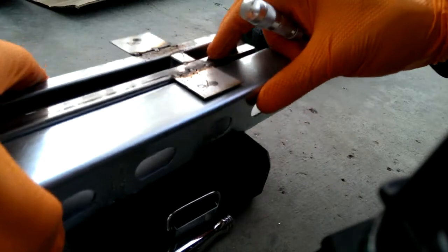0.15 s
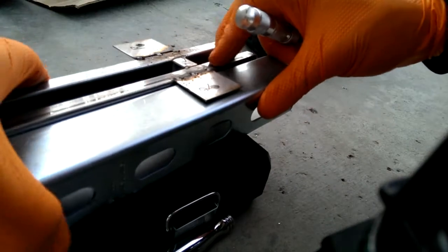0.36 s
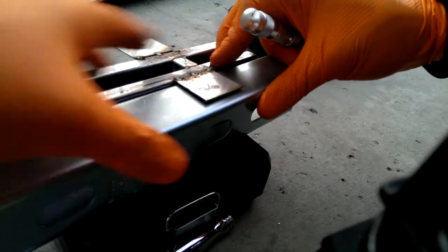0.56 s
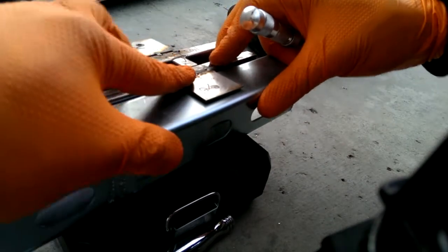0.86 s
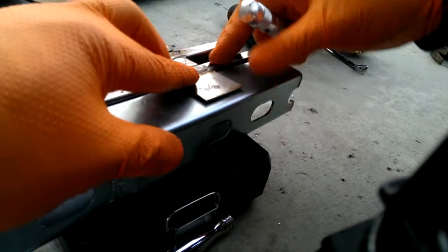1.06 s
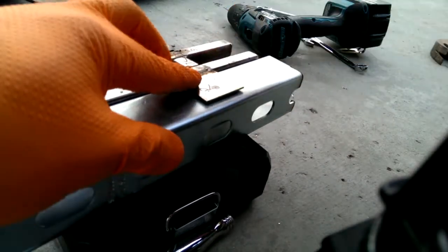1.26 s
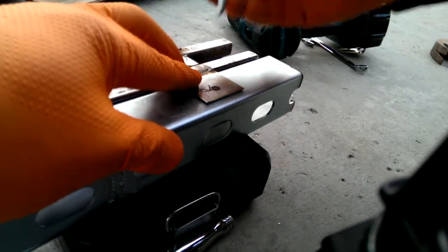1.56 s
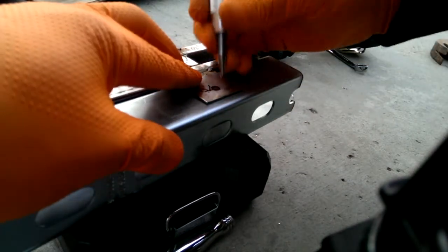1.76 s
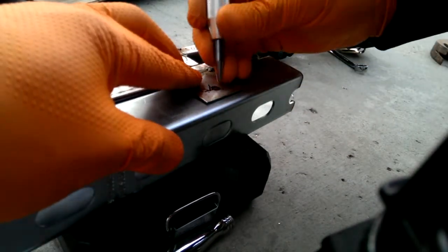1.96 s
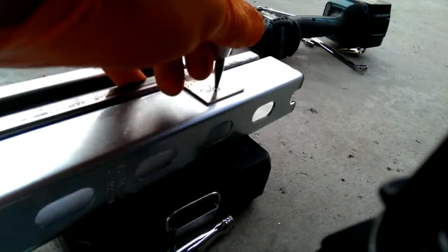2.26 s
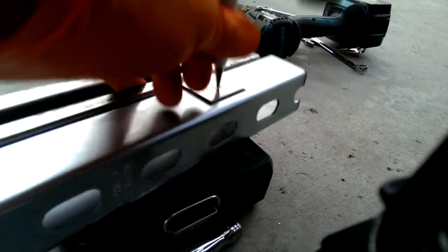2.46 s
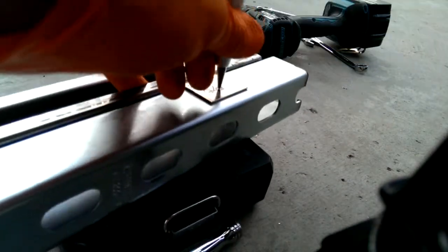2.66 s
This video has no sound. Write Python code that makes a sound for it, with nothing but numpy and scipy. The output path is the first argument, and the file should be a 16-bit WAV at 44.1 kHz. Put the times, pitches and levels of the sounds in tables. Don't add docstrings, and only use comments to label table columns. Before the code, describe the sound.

Loud metallic crack of a spring punch on a steel channel, following bracket clinks and quiet glove ticks

```python
import sys
import numpy as np
from scipy import signal
from scipy.io import wavfile
from scipy.ndimage import uniform_filter1d

SR = 44100
rng = np.random.default_rng(int(sys.argv[2]) if len(sys.argv) > 2 else 0)


def log_audio(samples):
    frames = np.atleast_2d(samples).T
    limited = np.clip(frames, -1, 1)
    pcm = np.round(limited * 32767).astype(np.int16)
    wavfile.write(sys.argv[1], SR, pcm)


def nominal_scale(level):
    x = np.asarray(level, float) / 20
    return 10 ** x


N = 123479

# pitch in Hz, level in dB per Hz.
RUMBLE_SHAPE = [(24, -41), (33, 0.5), (45, -0.5), (70, -3.5), (90, -13), (125, -13.5), (165, -18.5),
                (330, -36)]
HISS_SHAPE = [(250, -18.5), (330, -6.5), (600, -21), (1500, -13), (2700, -19), (5000, -24.5), (9000, -30),
              (16000, -30)]
# pitch in Hz, likeness from -1 to 1.
EAR_LIKENESS = [(60, 0.45), (500, 0.86), (1400, -0.49), (4000, 0.1)]
# pitch in Hz, left over right in dB.
AIR_LEAN = [(500, 0.5), (4400, 1.2), (9000, 3)]
# time in seconds, level in dB.
SWELL = [(0, 2.5), (.25, 2.5), (.9, -0.5), (1.4, -1), (1.9, -3), (2.8, -2)]
# pitch in Hz, level in dB.
MOTOR_HUMS = [(48.4, -51), (64.5, -48.5), (262.4, -68), (524.5, -78.5)]
# time in seconds, level in dB.
WHINE_LEVEL = [(.3, -59), (.54, -50), (.62, -69.5), (.87, -52), (1.0, -69.5), (1.57, -71.5), (1.78, -55.5),
               (2.03, -70), (2.25, -57.5), (2.68, -69), (2.8, -57)]

# pitch in Hz, level in dB per Hz.
STEEL_BODY = [(90, -18), (200, -12), (380, -5.5), (900, -7.5), (1400, -7.5), (4000, -8), (6000, -19)]
STEEL_TREBLE = [(5000, -7), (7000, -15.5), (14800, -15), (15600, -30)]
# pitch in Hz, left over right in dB.
NEAR_LEAN = [(700, 2), (1300, 9.5), (2400, 4), (4400, 2), (8100, 10.5), (15000, 12.5)]

# time in seconds, level in dB, brightness in dB.
SLIDE = [(0, -44.5, -13.5), (.05, -53.5, -5.5), (.11, -62, -2), (.116, -37, -3), (.21, -36, -12),
         (.24, -46, -4), (.29, -40.5, -23), (.345, -35, -33), (.375, -64, -13)]
SETTLE = [(2.372, -21.5, -19), (2.41, -29.5, -5), (2.43, -32, 5), (2.49, -26, -6), (2.53, -35.5, -11),
          (2.57, -26, -33), (2.6, -41.5, -29), (2.71, -55, -42), (2.8, -58.5, -33)]
# start in seconds, peak in dB, main pitch in Hz,
# time to fall 60 dB in seconds, brightness in dB.
KNOCKS = [(.114, -28.5, 630, 0.061, -8), (0.126, -20.5, 7600, 0.012, -1), (0.1342, -27, 5000, 0.03, 8),
          (.138, -25, 2820, 0.019, -13), (0.143, -26.5, 2880, 0.03, 5), (.163, -31.5, 6200, .04, 4),
          (.181, -19, 850, 0.043, -15), (0.184, -20, 2410, 0.029, 3), (.2, -17, 1050, 0.027, -23),
          (.25, -17, 8160, 0.023, 7), (0.269, -14, 696, 0.02, -2), (.281, -15, 2820, 0.075, -4.5),
          (.335, -23.5, 1150, 0.036, -46), (2.472, -16, 905, 0.035, -22), (2.51, -18.5, 1440, 0.08, -28),
          (2.608, -24, 1440, 0.047, -31), (2.641, -32.5, 1060, 0.038, -33), (2.6606, -29, 3310, 0.14, -33),
          (2.695, -35, 2020, 0.037, -21), (2.69, -33.5, 1380, 0.089, -37)]
# pitch in Hz, level in dB, time to fall 60 dB in seconds.
HOLLOW_BOOMS = [(211.3, -38, 0.039), (405.4, -43, 0.03), (653, -34, 0.024)]
# start in seconds, level in dB, pitch in Hz,
# time to fall 60 dB in seconds.
THUMPS = [
    (.02, -46, 458, 0.13),
    (.186, -33, 202, 0.092),
    (2.166, -53.5, 1216, .1),
    (2.368, -22, 305, 0.097),
    (2.378, -33, 125, 0.17),
    (2.545, -31.5, 1208, 0.11),
    (2.56, -34, 389, 0.14),
    (2.661, -53.5, 2760, .5),
    (2.688, -46.5, 621, .3),
]

# start in seconds, peak in dB, pitch in Hz, width in Hz,
# time to fall 60 dB in seconds.
TICKS = [(0.614, -45.5, 1650, 900, .025), (0.671, -41.5, 1190, 400, 0.023),
         (0.689, -47, 11000, 12000, 0.013), (0.754, -43.5, 4500, 5000, 0.0096),
         (.97, -44, 5570, 7000, 0.022), (1.123, -49.5, 5000, 3000, .03), (1.2548, -48, 1840, 600, 0.053),
         (1.307, -45, 3400, 3000, 0.011), (1.4291, -39, 5400, 9000, 0.011), (1.4413, -44, 855, 400, .025),
         (1.442, -41, 3530, 2980, 0.025), (1.461, -48, 1840, 700, .025), (1.4817, -33.5, 2250, 2510, 0.011),
         (1.4819, -34.5, 9000, 9000, 0.011), (1.577, -53, 2000, 600, 0.027), (1.612, -48, 2100, 700, 0.057),
         (1.8937, -52.5, 2100, 1500, 0.016), (2.165, -46, 2330, 1800, 0.029),
         (2.319, -50, 4000, 4000, 0.016)]
# start in seconds, length in seconds, level in dB, centre in Hz, width in Hz.
RUBS = [(0.444, 0.12, -53.5, 5400, 4000), (0.425, 0.16, -60.5, 11700, 4900),
        (0.59, 0.071, -59.5, 3470, 4000), (.73, 0.066, -64, 4000, 3000), (.75, 0.049, -61, 1700, 150),
        (.9, 0.28, -67, 10400, 6000), (0.999, 0.034, -60.5, 11000, 4000), (1.235, .06, -64.5, 4000, 3000),
        (1.566, 0.074, -60.5, 12000, 6000), (1.556, 0.085, -62.5, 1950, 895), (1.593, .04, -61, 3600, 2500),
        (2.009, 0.13, -69.5, 3980, 6070), (2.204, 0.087, -60.5, 3700, 450), (2.24, .045, -68, 2900, 300)]
# start in seconds, length in seconds, level in dB; then its pitches in Hz.
SQUEAK = (0.843, 0.15, -73.5)
SQUEAK_HZ = (3700, 6400, 9000)

# start in seconds, peak in dB, crack pitch in Hz,
# time to fall 60 dB in seconds, left over right in dB.
BLOWS = [
    (2.3671, -6.5, 2280, 0.08, 10),
    (2.372, -2.5, 3700, 0.067, -8.5),
    (2.382, -11.5, 5600, 0.068, 6),
    (2.388, -10.5, 4430, 0.085, 8),
    (2.3955, -10.5, 3470, 0.038, -1),
    (2.403, -9.5, 1500, 0.025, 3.5),
    (2.408, -15, 1670, 0.017, 8),
    (2.46, -19, 4400, .04, 7),
    (2.484, -20.5, 3020, 0.078, 4),
    (2.5413, -13, 3700, 0.083, 1),
]
BLOW_RING_DB = [-4.5, -3, -8.5, -0.5, -7, -6, -6.5, -9, -14, -15]
# pitches in Hz, then for each the level in dB and time to fall 60 dB in seconds.
PUNCH_HZ = [4314, 4371, 4528, 5259, 5480, 6403, 6524, 7095, 10519, 11562, 11713, 13103, 14420]
PUNCH_RING = [(-1, 0.52), (-0.5, 0.47), (-7, 0.44), (-9.5, .4), (-11, 0.22), (-13, 0.57), (-15, .5),
              (-8, .3), (-9, .3), (-8, .3), (-5.5, 0.21), (-7, 0.15), (-14, .12)]
BRACKET_HZ = [2567, 2762, 2985, 3363, 3756, 3953, 8172, 9060, 10164, 11054, 12460]
BRACKET_RING = [(-13.5, .4), (-10, 1), (-11.5, 0.56), (-6, .45), (-12.5, 0.27), (-4, .38), (-16, 0.37),
                (-15, 0.22), (-15, 0.28), (-11.5, 0.23), (-18, .3)]
# time in seconds, level in dB.
GRIP = [
    (2.37, 0),
    (2.47, 2.5),
    (2.52, -4),
    (2.55, 2),
    (2.6, -5.5),
    (2.66, -18),
]


def evened(x):
    return x / np.sqrt(np.mean(x ** 2) + 1e-20)


def read(points, hz):
    f, value = np.transpose(points)
    return np.interp(np.log(hz + 1), np.log(f + 1), value)


def follow(curve, t):
    return nominal_scale(np.interp(t, *np.transpose(curve)))


def add(mix, s, sound):
    part = mix[:, round(s * SR):][:, :sound.shape[1]]
    part += sound[:, :part.shape[1]]


def coloured(x, db_of):
    db = np.maximum(db_of(abs(np.fft.fftfreq(2048, 1 / SR))), -90)
    minimum_phase = signal.hilbert(np.log(nominal_scale(db))).conj()
    taps = np.fft.ifft(np.exp(minimum_phase)).real[..., :1024]
    return signal.oaconvolve(x, taps * np.ones((2, 1)), axes=1)[:, :x.shape[1]]


def ears(hz):
    return np.outer([.5, -.5], read(NEAR_LEAN, hz))


def air(shape, level_db, patchy_db):
    frames, hz = N // 512 + 5, np.fft.rfftfreq(2048, 1 / SR)
    a, b, c, d, patches = rng.standard_normal((frames, 1025, 5)).T
    patches = evened(uniform_filter1d(uniform_filter1d(patches, 20, 0), 6, 1))
    same = np.clip(read(EAR_LIKENESS, hz), -1, 1)[:, None]
    left = a + 1j * b
    right = same * left + np.sqrt(1 - same ** 2) * (c + 1j * d)
    outside = (hz < .6 * shape[0][0]) | (hz > shape[-1][0] + 900)
    db = read(shape, hz) - 99 * outside + np.outer([.5, -.5], read(AIR_LEAN, hz))
    spectra = np.array([left, right]) * nominal_scale(db[:, :, None] + patchy_db * patches)
    noise = signal.istft(spectra, nperseg=2048, noverlap=1536)[1][:, :N]
    return nominal_scale(level_db) * evened(noise)


def workshop():
    t = np.arange(N) / SR
    waver_hz, ear_turns = 4, 0.41
    low = air(RUMBLE_SHAPE, -44.5, patchy_db=2.5)
    for hz, db in MOTOR_HUMS:
        beats = 0
        for k in (-.9, -.3, .45):
            turns = waver_hz * k * t + rng.random() + ear_turns * rng.random((2, 1))
            beats = beats + np.exp(2j * np.pi * turns)
        low += nominal_scale(db) * (beats * np.exp(2j * np.pi * hz * t)).real
    ear_phase = np.array([[0], [.6]])
    whine = nominal_scale(3.5) * follow(WHINE_LEVEL, t) * np.sin(2 * np.pi * 198.5 * t + ear_phase)
    swell_db = np.interp(t, *np.transpose(SWELL))
    hiss = air(HISS_SHAPE, -59.5, patchy_db=3.0) * nominal_scale(.7 * swell_db)
    return whine + low * nominal_scale(swell_db) + hiss


def hump(hz, centre_hz, width_hz):
    rise = (2 * hz / centre_hz) ** 2
    return rise / (1 + rise) / (1 + (2 * (hz - centre_hz) / width_hz) ** 2)


def steel(hz, bright_db):
    octaves_above = np.log2(np.maximum(hz / STEEL_BODY[-1][0], 1))
    octaves_below = np.log2(np.maximum(STEEL_TREBLE[0][0] / (hz + 1), 1))
    body = nominal_scale(read(STEEL_BODY, hz) - 13.2 * octaves_above)
    treble = nominal_scale(bright_db + read(STEEL_TREBLE, hz) - 10.6 * octaves_below)
    return body ** 2 + treble ** 2


def burst(t60, power_of, peak_db):
    t = np.arange(6000) / SR
    noise = rng.standard_normal((2, len(t)))
    x = coloured(noise, lambda hz: 10 * np.log10(power_of(hz) + 1e-12) + ears(hz))
    x *= nominal_scale(-60 * t / max(t60, .004)) * np.minimum(t / 0.00039, 1)
    return nominal_scale(peak_db + 4.5) * x / abs(x).max()


def chatter(curve):
    contacts_per_s, spread_db, t60 = 300, 3.5, 0.039
    s, db, bright_db = np.transpose(curve)
    t, u = np.arange(21000) / SR + s[0], np.arange(1500) / SR
    size = nominal_scale(spread_db * np.minimum(rng.exponential(1, len(t)), 4))
    size = size * (rng.random(len(t)) < contacts_per_s / SR)
    patch = rng.integers(0, 6, len(t))
    out = np.zeros((2, len(t)))
    for k in range(6):
        ring = rng.standard_normal((2, len(u))) * nominal_scale(-60 * u / t60)
        out += signal.oaconvolve((size * (patch == k))[None], ring, axes=1)[:, :len(t)]
    low = coloured(out, lambda hz: 10 * np.log10(steel(hz, -60)) + ears(hz))
    top = coloured(out, lambda hz: 10 * np.log10(steel(hz, 0) - steel(hz, -60) + 1e-9) + ears(hz))
    both = evened(low) + nominal_scale(np.interp(t, s, bright_db)) * evened(top)
    return s[0], (t <= s[-1]) * nominal_scale(np.interp(t, s, db)) * both


def bracket():
    out, t = np.zeros((2, N)), np.arange(9000) / SR
    add(out, *chatter(SLIDE))
    add(out, *chatter(SETTLE))
    for s, db, pitch_hz, t60, bright_db in KNOCKS:
        add(out, s, burst(t60, lambda hz: 0.22 * steel(hz, bright_db) + .5 * hump(hz, pitch_hz, 550), db))
    boom = sum(nominal_scale(db - 60 * t / t60) * np.sin(2 * np.pi * hz * t) for hz, db, t60 in HOLLOW_BOOMS)
    dull = coloured(out, lambda hz: -.003 * np.maximum(hz - 10500, 0))
    return dull + signal.oaconvolve(out, boom[None], axes=1)[:, :N]


def thumps():
    out, t = np.zeros((2, N)), np.arange(12000) / SR
    for s, db, hz, t60 in THUMPS:
        fade = nominal_scale(db + ears(hz) - 60 * t / t60) * np.minimum(t / 0.0032, 1)
        add(out, s, fade * np.sin(2 * np.pi * hz * t))
    return out


def gloves():
    out = np.zeros((2, N))
    for s, length, db, centre_hz, width_hz in RUBS:
        grit = rng.standard_normal((2, 12000)) * nominal_scale(2.5 * np.minimum(rng.exponential(1, 12000), 4))
        u = np.minimum(np.arange(12000) / SR / length, 1)
        rub = coloured(grit, lambda hz: 15 * np.log10(hump(hz, centre_hz, width_hz) + 1e-9) + ears(hz))
        add(out, s, nominal_scale(db) * np.sin(np.pi * u) ** 0.34 * evened(rub))
    for s, db, pitch_hz, width_hz, t60 in TICKS:
        add(out, s, burst(t60, lambda hz: hump(hz, pitch_hz, width_hz) ** 2, db))
    s, length, db = SQUEAK
    t = np.arange(round(length * SR)) / SR
    for hz in SQUEAK_HZ:
        add(out, s, nominal_scale(db + ears(hz)) * np.sin(np.pi * t / length) * np.sin(2 * np.pi * hz * t))
    return out


def modes():
    draw, t = rng.random((320, 3)), np.arange(18000, dtype=np.float32) / SR
    crowd_hz = 700 + 14600 * draw[:, 0]
    crowd_db = -35 - 9 * draw[:, 1] + 10 * np.log10(steel(crowd_hz, 0))
    crowd_t60 = 0.39 * (crowd_hz / 4000) ** -0.2 * (.5 + draw[:, 2])
    main_db, main_t60 = np.transpose(PUNCH_RING + BRACKET_RING)
    hz = np.append(PUNCH_HZ + BRACKET_HZ, crowd_hz)
    db = np.append(main_db - 23.5, crowd_db)
    t60 = np.append(main_t60, crowd_t60)
    turns = np.exp(np.outer(2j * np.pi * hz - np.log(1000) / t60, t))
    starts = nominal_scale(db + ears(hz)) * np.exp(2j * np.pi * rng.random((2, len(hz))))
    return (starts @ turns).real * np.minimum(t / 0.0013, 1)


def punch():
    out, drive = np.zeros((2, N)), np.zeros((2, N))
    for (s, db, pitch_hz, t60, pan_db), ring_db in zip(BLOWS, BLOW_RING_DB):
        bright_db = 5 - 48 * (s - BLOWS[0][0])
        crack = burst(t60, lambda hz: 0.19 * steel(hz, bright_db) + 1.6 * hump(hz, pitch_hz, 1460), db)
        add(out, s, crack * nominal_scale(np.array([[.5], [-.5]]) * pan_db))
        add(drive, s, nominal_scale(ring_db) * np.ones((2, 1)))
    ring = signal.oaconvolve(drive, modes(), axes=1)[:, :N]
    return out + ring * follow(GRIP, np.arange(N) / SR)


def room(x):
    t = np.arange(SR // 2) / SR
    tail = rng.standard_normal((2, len(t))) * nominal_scale(-60 * t / 0.51) * np.minimum(t / 0.0066, 1)
    tail = signal.lfilter([1], [1, -.5], tail)
    return nominal_scale(-26) * signal.fftconvolve(x, tail / np.linalg.norm(tail[0]), axes=1)[:, :N]


def scene():
    near = bracket() + thumps() + gloves() + punch()
    return near + room(near) + workshop()


def roll_off(x):
    return signal.sosfilt(signal.butter(12, 16850, fs=SR, output="sos"), x)


def record(dry):
    clip = 0.88
    overloaded = clip * np.tanh(dry / clip)
    edge = signal.firwin(201, 15900, fs=SR)[None]
    mix = signal.oaconvolve(overloaded, edge, "same")
    return roll_off(mix)


dry = scene()
out = record(dry)
log_audio(out)
```